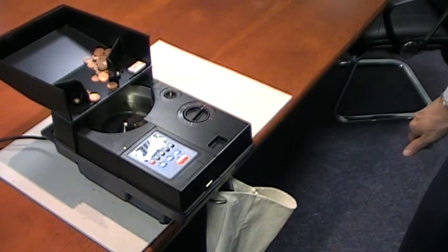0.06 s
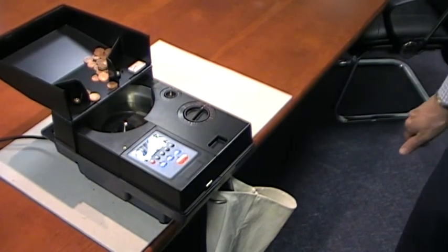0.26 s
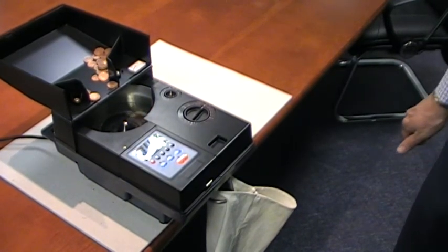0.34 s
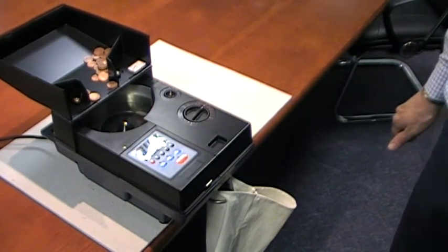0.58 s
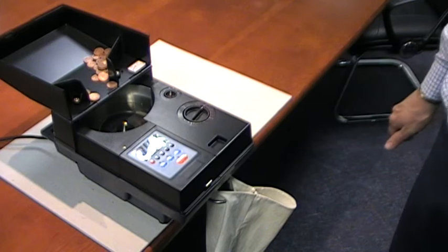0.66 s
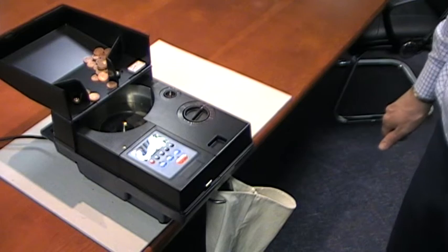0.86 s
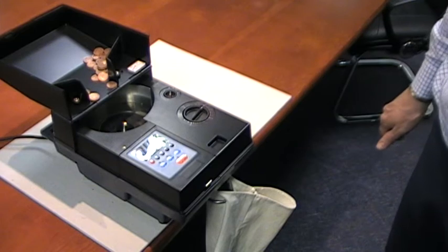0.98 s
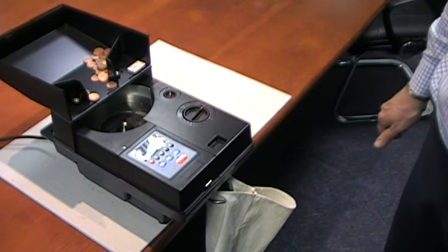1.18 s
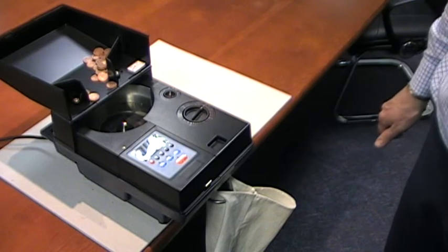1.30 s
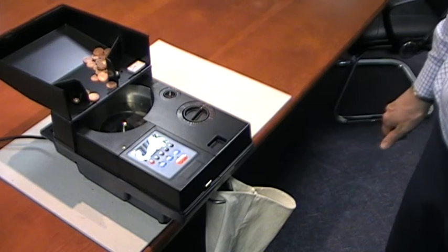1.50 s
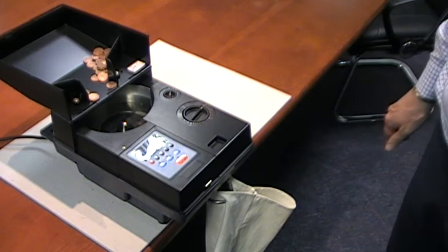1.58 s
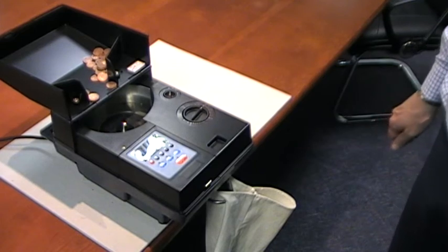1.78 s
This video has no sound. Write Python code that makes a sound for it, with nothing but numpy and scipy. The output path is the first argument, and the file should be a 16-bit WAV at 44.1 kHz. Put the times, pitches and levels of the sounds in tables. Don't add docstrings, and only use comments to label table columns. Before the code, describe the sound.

A small coin counter on a table starts abruptly, its motor rattling the plastic case while a steel disc scrapes and coins clack sharply; it brakes with a dull clang, then a relay ticks. Close, lively indoor stereo pickup.

```python
import sys
import numpy as np
from scipy import signal
from scipy.fft import rfft, irfft, next_fast_len
from scipy.io import wavfile
from scipy.ndimage import map_coordinates

SR = 44100
rng = np.random.default_rng(int(sys.argv[2]) if len(sys.argv) > 2 else 0)


def materialize(psi):
    bounded = np.clip(np.atleast_2d(psi).T, -1, 1)
    quanta = np.round(bounded * 32767).astype(np.int16)
    wavfile.write(sys.argv[1], SR, quanta)


def gain_from_db(level_db):
    decades = np.asarray(level_db, float) / 20
    return 10 ** decades


N = 81585

# (frequency [Hz], level [dB])
AIR_COLOUR = [(25, -25.5), (55, -7), (190, -5.5), (730, -10), (1400, -17), (7500, -31.5), (10000, -43),
              (14000, -69)]
# (frequency [Hz], likeness [-1 to 1])
AIR_ALIKE = [(100, -.2), (15000, -.1)]
# (frequency [Hz], level [dB])
FAN_TONES = [(339, -71), (463, -75.5), (721, -76.5), (1082, -69)]
# (time [s], gain [dB])
AIR_GAIN = [(0, -2.5), (.3, 1.5), (1.0, 1), (1.4, 1.5), (1.85, 2)]
# (frequency [Hz], level [dB])
RUMBLE_COLOUR = [(30, -20), (55, -1), (250, -3), (600, -37.5)]
# (time [s], level [dB])
RUMBLE_SWELL = [(0, -67.5), (.25, -58.5), (.33, -51), (.42, -61.5), (.95, -59), (1.2, -65), (1.55, -61.5),
                (1.85, -57)]

# (frequency [Hz], time to fall 60 dB [s])
ROOM_DECAY = [(200, .5), (2000, .45), (8000, 0.221), (15000, 0.17)]
# (frequency [Hz], level [dB])
ROOM_TINT = [(300, -0.5), (3000, -4), (6000, -1.5), (8500, 4), (13000, 1)]
# (frequency [Hz], likeness [-1 to 1])
ROOM_ALIKE = [(125, 0.77), (300, 0.83), (4000, 0.34), (8000, 0.21), (14000, .7)]

# (frequency [Hz], level [dB])
RELAY_TICK = [(240, -18), (500, 1), (1500, -11), (3930, -14.5), (5690, -14), (7400, -3), (13700, -18),
              (16000, -40)]
# (frequency [Hz], level [dB], time to fall 60 dB [s])
RELAY_HUM = [(339, -57, .2), (572, -50, .55), (612, -53, .4), (3650, -64, .17), (3850, -67, .15),
             (4050, -67, .14)]
# (delay after the tick [s], level [dB])
RELAY_BOUNCES = [
    (0, -6),
    (.02, 2.5),
    (.085, -7.5),
]

# (time [s], level [dB])
RUNDOWN = [(.75, -81), (.85, -53), (1.0, -59.5), (1.1, -61), (1.22, -68), (1.35, -73), (1.85, -91.5)]
# (frequency [Hz], level [dB], time to fall 60 dB [s])
BRAKE_TONES = [(310, -48, .8), (253, -46, .6), (452, -46, .35), (720, -35, .12), (830, -35, .1),
               (2350, -40, .35), (4250, -43, .35), (4850, -41, .35), (1100, -45, .15), (2500, -31, .13),
               (3560, -33, .15), (7150, -24, .07), (7800, -24, .07)]
# (frequency [Hz], level [dB], time to fall 60 dB [s])
JOLT_TONES = [(316, -15, .12), (657, -32, .1), (817, -28, .1), (200, -30, .12)]
# (time [s], level [dB])
JOLTS = [
    (.192, -16.5),
    (.224, 3),
    (.302, -9.5),
    (.355, -12),
    (.715, -15.5),
]
# (frequency [Hz], level [dB])
RIM_TONES = [(7030, -10.5), (7100, -3), (7170, -7), (9400, -18)]
# (middle [s], length [s], level [dB])
RUBS = [
    (0.367, .036, -25),
    (0.418, 0.026, -32.5),
    (0.517, 0.026, -23),
    (0.661, 0.036, -34),
    (0.703, 0.028, -26.5),
    (0.808, 0.027, -32.5),
]

# (frequency [Hz], level [dB], time to fall 60 dB [s])
COIN_TONES = [(3000, -9, .005), (4600, -4, .006), (6480, 0, .013), (7100, -3, .008), (7750, -3, .007),
              (8700, 0, .005), (10000, -3, .004), (11100, -1, .005), (12400, -3, .004), (13700, -8, .004)]
# (frequency [Hz], level [dB])
CRACK_COLOUR = [(880, -58), (1500, -27.5), (5770, -8), (6370, 0), (8830, 3), (12900, -12), (15400, -38.5),
                (16000, -49.5)]
# (time [s], peak level [dB], favoured frequency [Hz])
CONTACTS = [(.2592, -12, 10900), (.26, -2.5, 7800), (.2612, -4, 7900), (.2622, -5, 7700),
            (.2632, -5.5, 7150), (.265, -10, 6900), (0.3924, 2.5, 8700), (.3932, -7.5, 10800),
            (.3944, -8.5, 6500), (.396, -7.5, 6900), (0.3978, -18.5, 8000), (.5604, -17.5, 7000),
            (.5608, -0.5, 10900), (.5619, -8, 8100), (.5628, -8, 6900), (.564, -7, 8750),
            (.5665, -19, 8600), (.7018, -14.5, 6480), (.7028, -4.5, 7900), (.7043, -11, 6500),
            (.7055, -13.5, 6500)]

# (time [s], level [dB])
SCRAPE = [(.2, -75.5), (.205, -49.5), (.225, -42), (.252, -20.5), (.3, -32.5), (.45, -38.5), (.7, -35),
          (.8, -49), (.87, -54.5)]
# (frequency [Hz], level [dB], time to fall 60 dB [s])
DISC_TONES = [(2444, -15, .5), (3590, -13, .45), (5140, -8, .44), (6019, -8, .4), (7030, -4, .4),
              (7150, -3, .36), (7660, -4, .42), (7827, -3, .4), (8300, -7, .27), (9310, -10, .33),
              (9577, -7, .31), (10590, -16, .22), (11750, -11, .24), (13700, -29, .27)]
# (frequency [Hz], level [dB])
DISC_WASH = [(700, -27), (1200, -12), (5600, -10.5), (7000, -1), (8300, -6), (10000, -21), (12000, -30),
             (14500, -55)]
# (time [s], disc ring level [dB], case rap level [dB])
TAPS = [(.204, -52.5, -39), (.230, -37, -24), (.240, -42, -25), (0.249, -31, -23.5), (.263, -27, -26.5),
        (.277, -33, -30), (.284, -35, -20.5), (.5106, -33, -36.5), (.72, -38.5, -31.5), (.804, -44.5, -52),
        (.8735, -27, -31.5)]
# (time [s], level [dB])
CLACKS = [
    (.259, -3),
    (.3925, 1.5),
    (.5605, -1),
    (.7019, -3.5),
]
# (frequency [Hz], level [dB])
RAP_COLOUR = [(400, -27.5), (700, -4.5), (2300, -3), (4700, -6), (7900, -6.5), (12000, -17.5),
              (16000, -62.5)]

# (time [s], level [dB])
MOTOR_SHAKE = [(.193, -52.5), (.2, -39.5), (.225, -33.5), (.245, -28.5), (.3, -30.5), (.43, -37.5),
               (.57, -34), (.73, -35.5), (.85, -45), (.95, -50)]
# (frequency [Hz], width [Hz], level [dB])
CASE_TONES = [(214, 20, -11), (323.6, 24, 1), (474, 24, -11.5), (588.5, 30, 0), (660, 49, -5.5),
              (810, 49, -1), (1120, 54, -22.5), (1817, 73, -16), (2469, 59, -15.5)]
# (frequency [Hz], level [dB])
CASE_WASH = [(150, -15), (500, -10), (1500, -19), (4000, -27), (9000, -54.5)]

# (frequency [Hz], level difference [dB])
LEAN = [(100, 2.5), (400, 4), (5000, -1.5), (13000, 1)]
# (frequency [Hz], phase [rad])
SKEW = [(500, 0.0097), (5000, 0.17), (8500, 0.47), (13000, 0.74)]
# (frequency [Hz], level [dB])
MUTE = [(9800, -56), (12000, -46), (12500, -39), (14000, -39), (15000, -40), (16200, -36)]


def unit(x):
    return x / np.sqrt(np.mean(x ** 2) + 1e-20)


def along(points, hz):
    f, v = np.transpose(points)
    return np.interp(np.log(hz + 1), np.log(f + 1), v)


def curve(rows, before):
    s, v = np.transpose(rows)
    return np.interp(np.arange(N) / SR, s, v, left=before)


def wobble(rate):
    knots = rng.standard_normal(int(N * rate / SR) + 4)
    return map_coordinates(knots, [np.arange(N) * rate / SR])


def filtered(x, response):
    m = next_fast_len(N + SR // 2)
    return irfft(rfft(x, m) * response(np.fft.rfftfreq(m, 1 / SR)), m)[..., :N]


def resonances(table):
    def response(f):
        total = 0
        for k, (centre, width, db) in enumerate(table):
            peak = 1j * f * width / (centre * centre - f * f + 1j * f * width)
            total = total + (-1) ** k * gain_from_db(db) * peak
        return total
    return response


def typical_gain(response):
    return np.sqrt(np.mean(np.abs(response(np.arange(1, SR / 2))) ** 2))


def noise(colour, size=N):
    m = next_fast_len(size)
    spectrum = rfft(rng.standard_normal(m)) * gain_from_db(along(colour, np.fft.rfftfreq(m, 1 / SR)))
    return unit(irfft(spectrum, m)[:size])


def spread(pair, alike):
    def shares(hz):
        turn = np.arccos(np.clip(along(alike, hz), -1, 1)) / 2
        return np.array([np.cos(turn), np.sin(turn)])
    mid, side = filtered(pair, shares)
    return np.array([mid + side, mid - side])


def ring(modes, t, vary_db, attack_s=.0001, split=0., count=1, scatter=1):
    total = 0
    for hz, db, t60 in modes:
        for _ in range(count):
            level = gain_from_db(db + vary_db * rng.normal() - 60 * t / t60)
            pitch = hz * (1 + split * rng.normal())
            total = total + level * np.sin(2 * np.pi * (pitch * t + scatter * rng.random()))
    return total * (1 - np.exp(-t / attack_s)) / np.sqrt(count)


def add(track, s, sound):
    part = track[round(s * SR):][:len(sound)]
    part += sound[:len(part)]


def grains():
    hit = rng.random(N) < 3500 / SR
    strength = rng.standard_normal(N) * gain_from_db(3 * rng.standard_normal(N) / 2)
    return unit(hit * strength + 0.11 * rng.standard_normal(N))


def air():
    t = np.arange(N) / SR
    hiss = np.array([gain_from_db(1.2 * wobble(6)) * noise(AIR_COLOUR) for _ in range(2)]) * gain_from_db(-59)
    fan = 0
    for hz, db in FAN_TONES:
        level = gain_from_db(db + 4 + 1.2 * wobble(40))
        fan = fan + level * np.sin(2 * np.pi * hz * t + .5 * wobble(40))
    rumble = np.array([gain_from_db(curve(RUMBLE_SWELL, 0) + 2.5 * wobble(7.7)) * noise(RUMBLE_COLOUR)
                       for _ in range(2)])
    return (spread(hiss, AIR_ALIKE) + fan) * gain_from_db(curve(AIR_GAIN, 0)) + rumble


def room(x):
    hz, t, z = signal.stft(rng.standard_normal((2, SR // 2)), SR, nperseg=256)
    fading = z * gain_from_db(-60 * t / along(ROOM_DECAY, hz)[:, None])
    tail = signal.istft(fading, SR, nperseg=256)[1]
    late = np.pad(x, (150, 0))[None]
    wet = signal.fftconvolve(late, tail / np.linalg.norm(tail[0]), axes=1)[:, :N]
    return spread(filtered(wet, lambda f: gain_from_db(along(ROOM_TINT, f))), ROOM_ALIKE)


def relay():
    out, t = np.zeros(N), np.arange(SR // 2) / SR
    start_s, tick_db, tick_t60 = 1.229, -26.5, 0.022
    tick = gain_from_db(tick_db - 60 * t / tick_t60) * (1 - np.exp(-t / .002)) * noise(RELAY_TICK, len(t))
    add(out, start_s, tick)
    for delay, db in RELAY_BOUNCES:
        hum = ring(RELAY_HUM, t, vary_db=2.5, attack_s=0.0019, split=0.02, count=4)
        add(out, start_s + delay, gain_from_db(db) * hum)
    return out


def rundown():
    t = np.arange(N) / SR
    level = gain_from_db(curve(RUNDOWN, -120) + 2.5 * wobble(22))
    return level * np.sin(2 * np.pi * 684 * t + 0.6 * wobble(22))


def brake():
    out, t = np.zeros(N), np.arange(SR // 2) / SR
    add(out, .874, ring(BRAKE_TONES, t, vary_db=1.5, attack_s=0.00059, split=0.0149, count=6))
    return out


def jolts():
    out, t = np.zeros(N), np.arange(SR // 2) / SR
    for s, db in JOLTS:
        add(out, s, gain_from_db(db) * ring(JOLT_TONES, t, vary_db=1, attack_s=.012, split=.02))
    return out


def rim():
    out, t = np.zeros(N), np.arange(SR // 2) / SR
    modes = [(hz, level, 1) for hz, level in RIM_TONES]
    for middle, length, db in RUBS:
        swell = np.sin(np.pi * np.clip(t / length, 0, 1)) ** 2
        add(out, middle - length / 2, gain_from_db(db) * swell * ring(modes, t, vary_db=3))
    return out


def coins():
    out, t = np.zeros(N), np.arange(SR // 20) / SR
    crack_db, crack_t60 = -9, .009
    for s, db, favoured_hz in CONTACTS:
        modes = []
        for hz, level, t60 in COIN_TONES:
            loss_db = max(-13, -28 * abs(np.log2(hz / favoured_hz)))
            modes.append((hz, level + loss_db, t60))
        crack = gain_from_db(crack_db - 60 * t / crack_t60) * noise(CRACK_COLOUR, len(t))
        snap = ring(modes, t, vary_db=1, split=0.008, scatter=0)
        add(out, s, gain_from_db(db - 3) * (snap + crack))
    return out


def disc():
    lines = resonances([(hz, 10 / t60, db) for hz, db, t60 in DISC_TONES])
    end = np.clip(np.arange(N) / SR - SCRAPE[-1][0], 0, 1) * -200
    effort = gain_from_db(curve(SCRAPE, -120) + end + 0.82 * wobble(40))
    singing = filtered(grains() * effort, lines) / typical_gain(lines)
    scraping = effort * unit(filtered(grains(), lambda f: gain_from_db(along(DISC_WASH, f))))
    out = gain_from_db(-3) * singing + gain_from_db(-3) * scraping

    t = np.arange(SR // 3) / SR
    wash_db, wash_t60, rap_t60 = 1, .32, 0.055
    clacks = [(s, db - 29, -120) for s, db in CLACKS]
    for s, ring_db, rap_db in list(TAPS) + clacks:
        wash = gain_from_db(wash_db - 60 * t / wash_t60) * noise(DISC_WASH, len(t))
        tones = ring(DISC_TONES, t, vary_db=1, attack_s=.0005, split=.004, count=4)
        add(out, s, gain_from_db(ring_db - 6) * (tones + wash))
        rap = gain_from_db(rap_db - 60 * t / rap_t60) * (1 - np.exp(-t / 0.00056))
        add(out, s, rap * noise(RAP_COLOUR, len(t)))
    return out


def motor():
    t = np.arange(N) / SR
    fade = np.clip(t - MOTOR_SHAKE[-1][0], 0, 1) * -150
    drive = grains() * gain_from_db(curve(MOTOR_SHAKE, -120) + fade + 1.5 * wobble(30))
    case_tones = resonances(CASE_TONES)
    body = lambda f: case_tones(f) + gain_from_db(along(CASE_WASH, f))
    shaking = filtered(drive, body) / typical_gain(body)

    start_s, stop_s = 0.31, 0.794
    running = np.clip((t - start_s) / 0.037, 0, 1) * np.clip((stop_s - t) / 0.014, 0, 1)
    whine = gain_from_db(-41 + 0.88 * wobble(22)) * np.sin(2 * np.pi * 473.5 * t + 0.39 * wobble(25))
    second_gear = gain_from_db(-42.5 + 3 * wobble(22)) * np.sin(2 * np.pi * 576.5 * t + 0.5 * wobble(22))
    return shaking + running * (whine + second_gear)


def mute_faint_highs(x, size=512, blocks=6, bins=8):
    hz, _, z = signal.stft(x, SR, nperseg=size)
    power = (np.abs(z) ** 2).sum(0)
    band = np.arange(len(hz)) // bins
    block = np.arange(z.shape[-1]) // blocks
    cells = np.add.reduceat(power, np.arange(0, len(band), bins), 0)
    cells = np.add.reduceat(cells, np.arange(0, len(block), blocks), 1)
    loud_enough = cells[band] > gain_from_db(2 * along(MUTE, hz))[:, None] * cells.sum(0)
    keep = loud_enough | (hz < 9800)[:, None]
    return signal.istft(z * keep[:, block], SR, nperseg=size)[1][:, :N]


def scene():
    running = motor() + disc() + coins()
    machine = running + rim() + jolts() + brake() + rundown() + relay()
    machine = filtered(machine, lambda f: (1j * f / (150 + 1j * f)) ** 3)
    half = lambda f: gain_from_db(along(LEAN, f) / 2) * np.exp(.5j * along(SKEW, f))
    direct = filtered(machine, lambda f: np.array([half(f), 1 / half(f)]))
    return direct + gain_from_db(-10.5) * room(machine) + air()


def band_limit(x):
    return signal.sosfilt(signal.butter(12, 16460, fs=SR, output="sos"), x)


def record(dry):
    clipped = np.clip(dry, -1, 1)
    limited = filtered(clipped, lambda hz: hz < 16300)
    mix = mute_faint_highs(limited)
    return band_limit(mix)


dry = scene()
out = record(dry)
materialize(out)
```